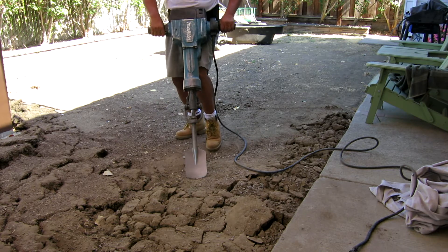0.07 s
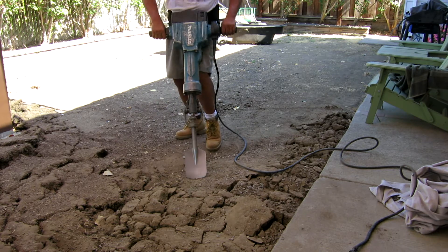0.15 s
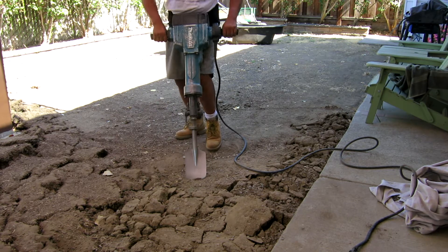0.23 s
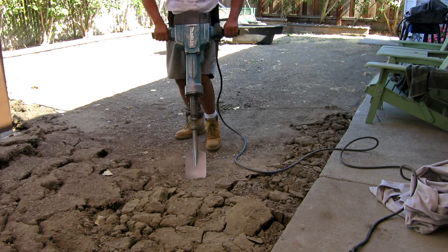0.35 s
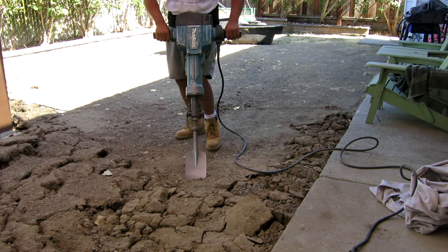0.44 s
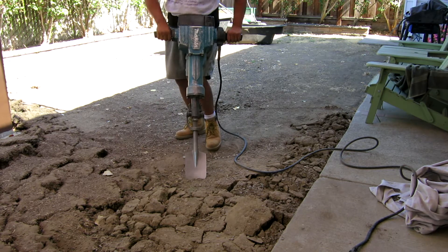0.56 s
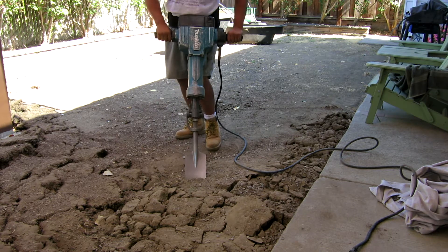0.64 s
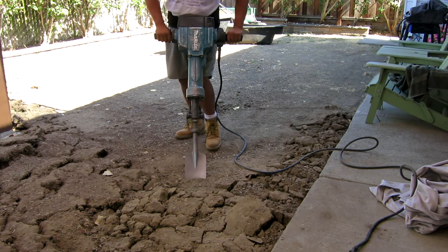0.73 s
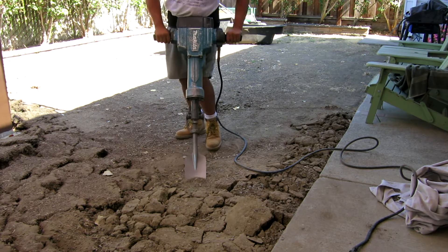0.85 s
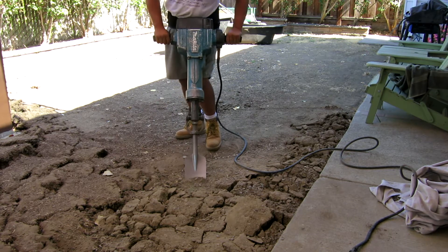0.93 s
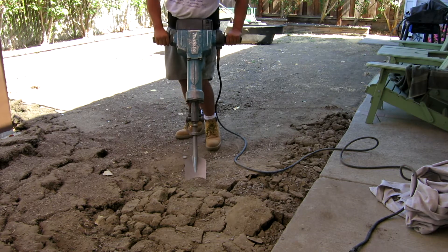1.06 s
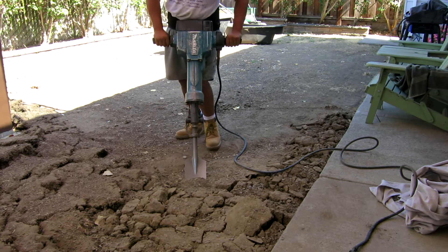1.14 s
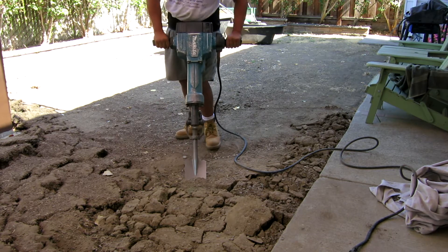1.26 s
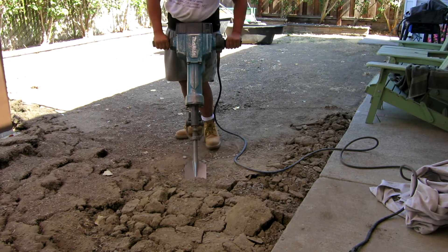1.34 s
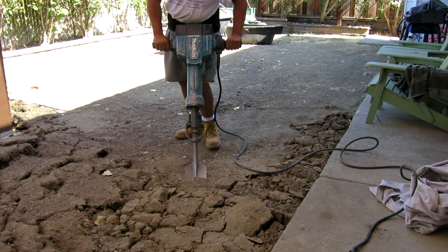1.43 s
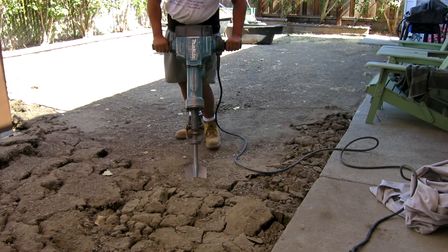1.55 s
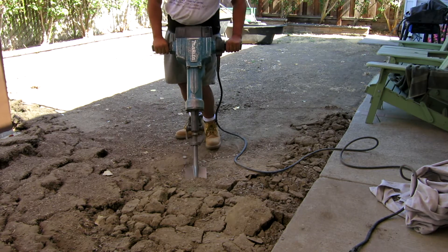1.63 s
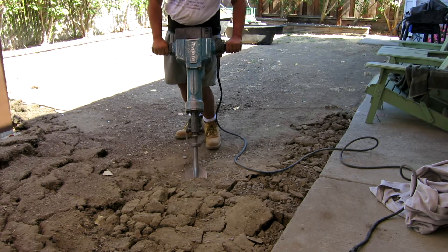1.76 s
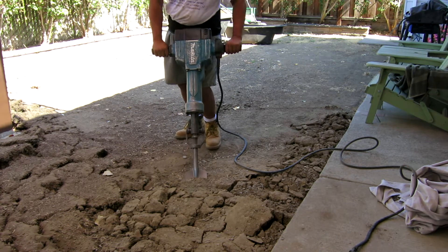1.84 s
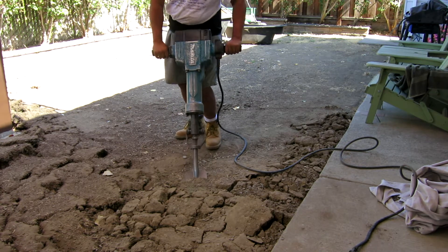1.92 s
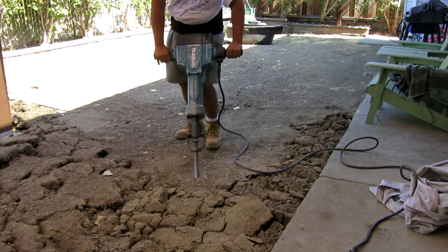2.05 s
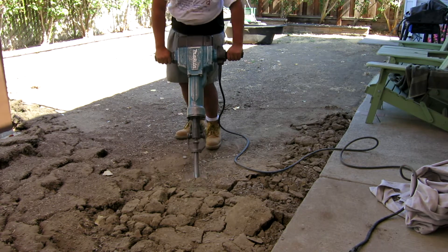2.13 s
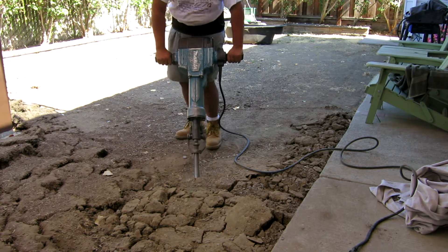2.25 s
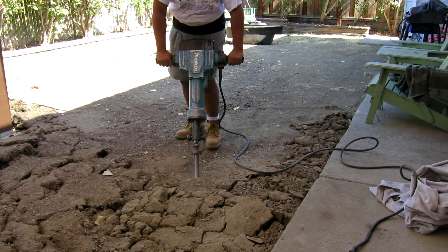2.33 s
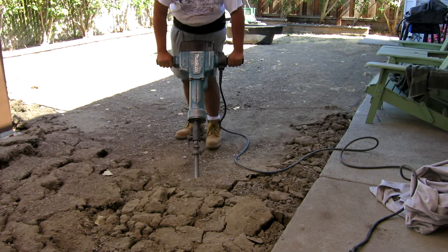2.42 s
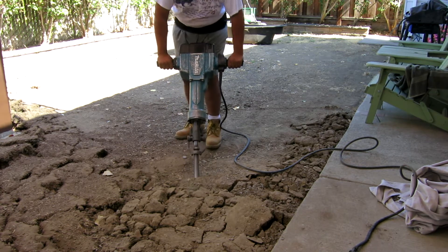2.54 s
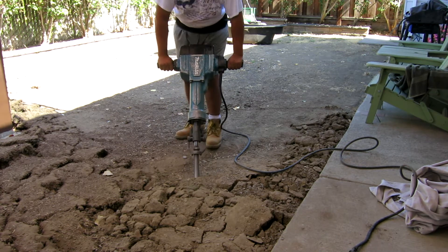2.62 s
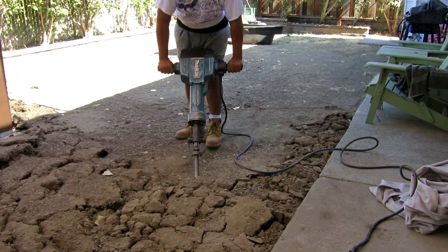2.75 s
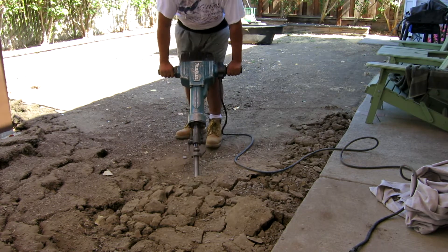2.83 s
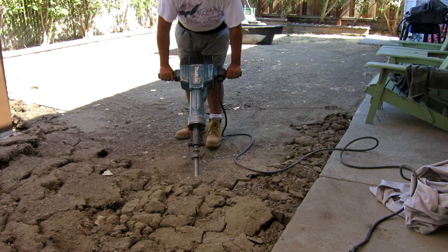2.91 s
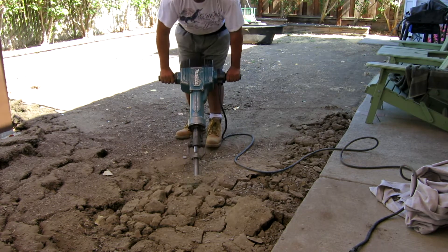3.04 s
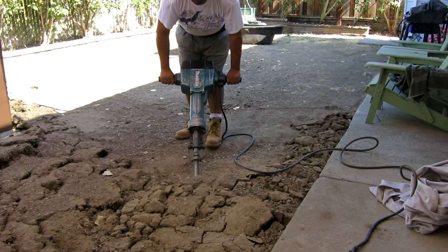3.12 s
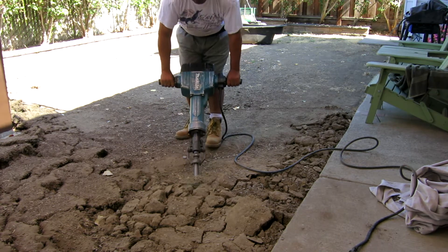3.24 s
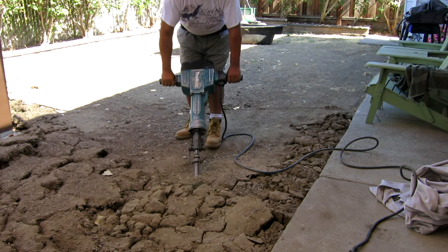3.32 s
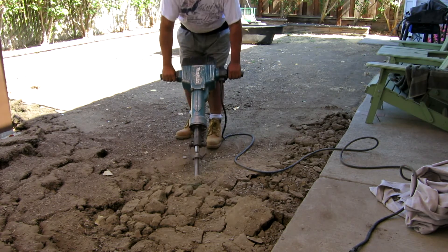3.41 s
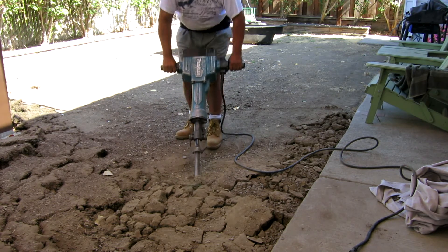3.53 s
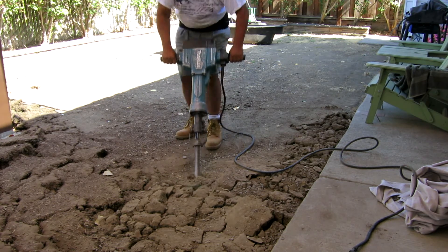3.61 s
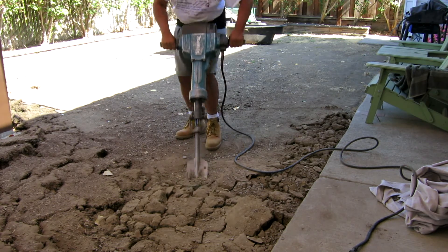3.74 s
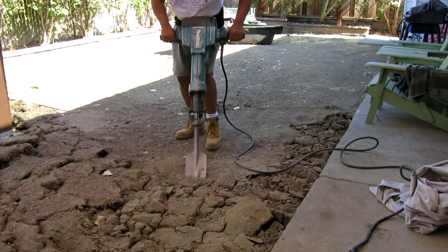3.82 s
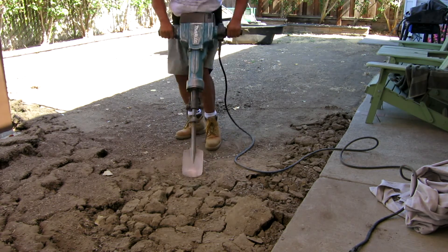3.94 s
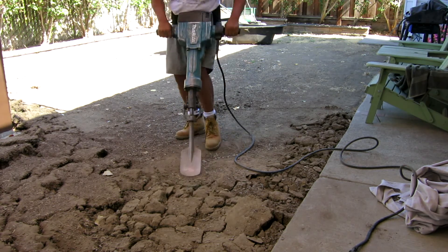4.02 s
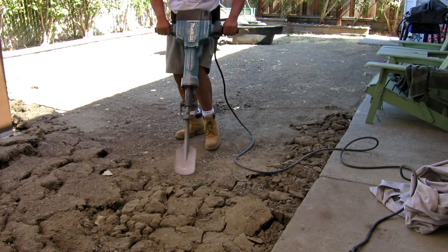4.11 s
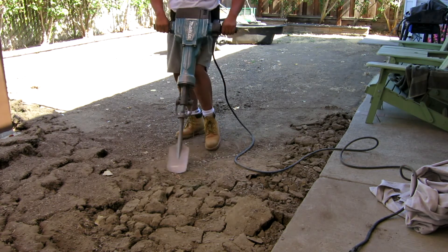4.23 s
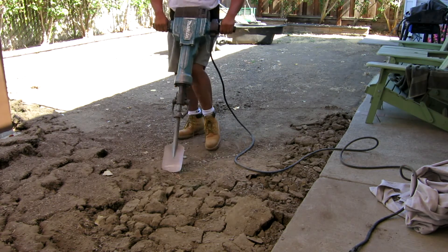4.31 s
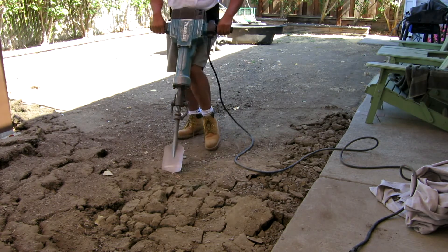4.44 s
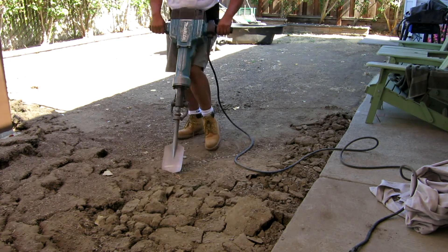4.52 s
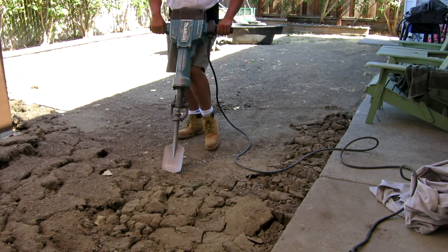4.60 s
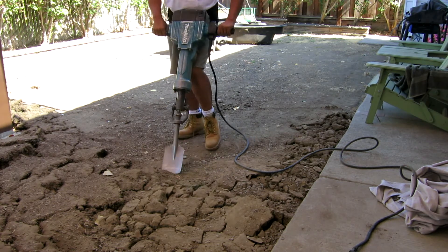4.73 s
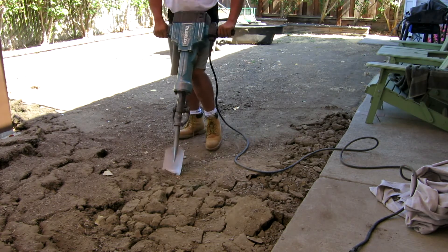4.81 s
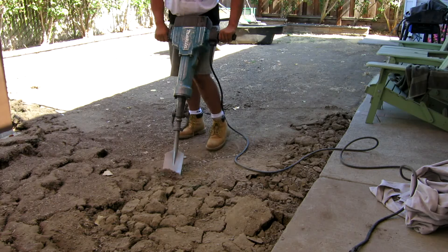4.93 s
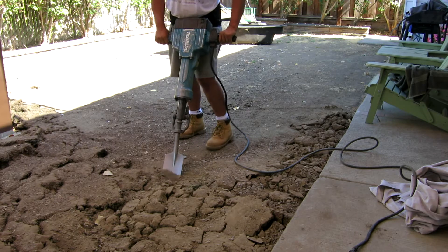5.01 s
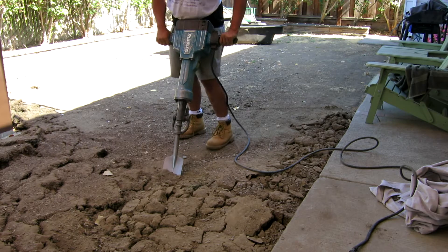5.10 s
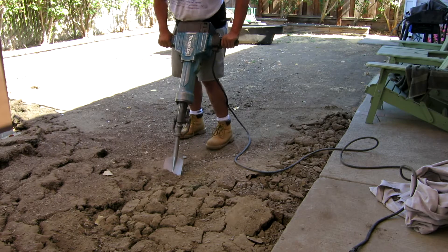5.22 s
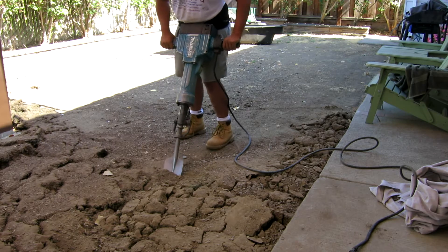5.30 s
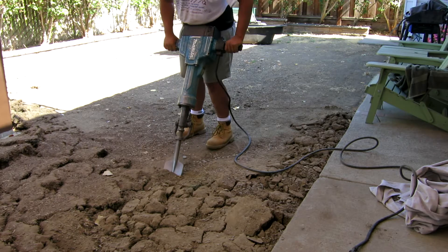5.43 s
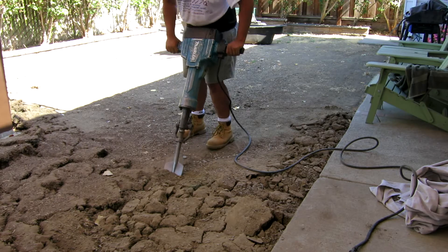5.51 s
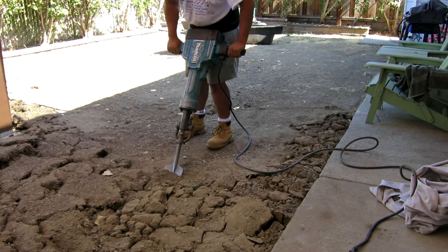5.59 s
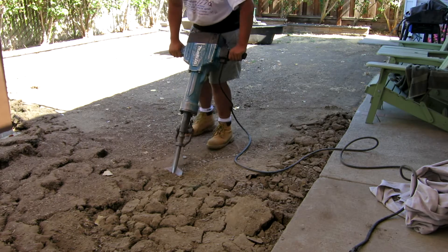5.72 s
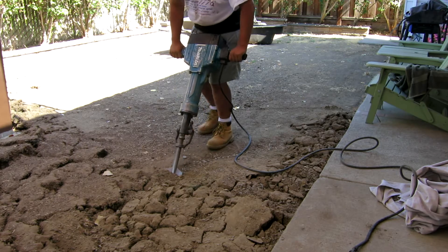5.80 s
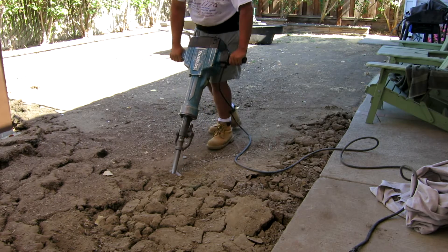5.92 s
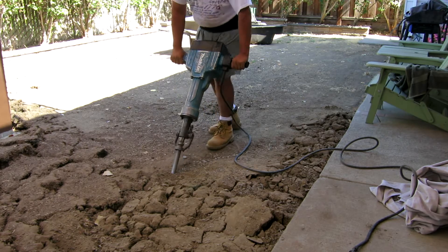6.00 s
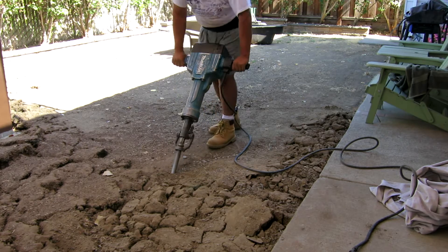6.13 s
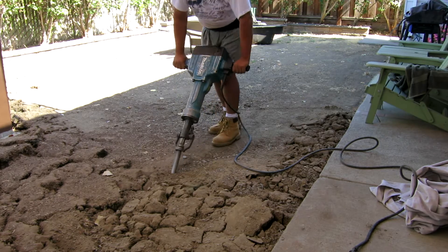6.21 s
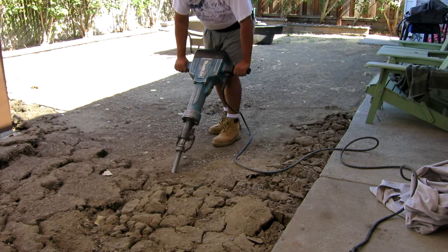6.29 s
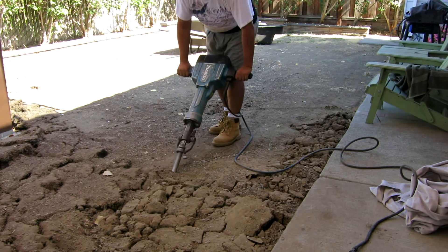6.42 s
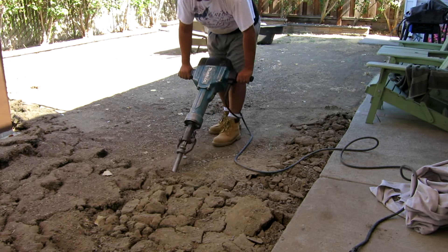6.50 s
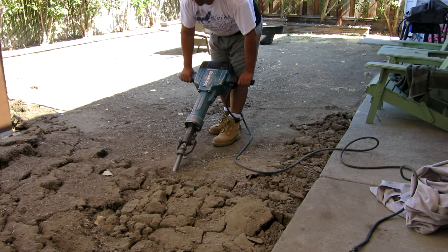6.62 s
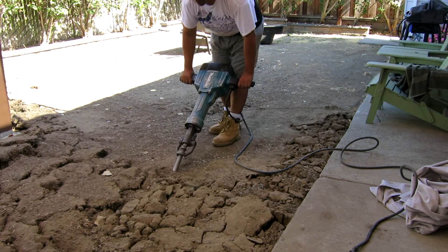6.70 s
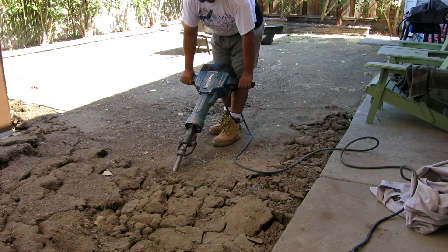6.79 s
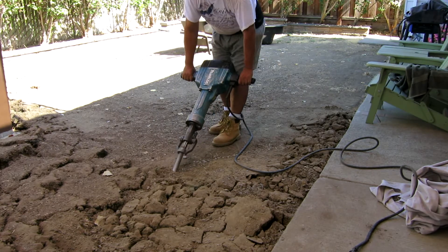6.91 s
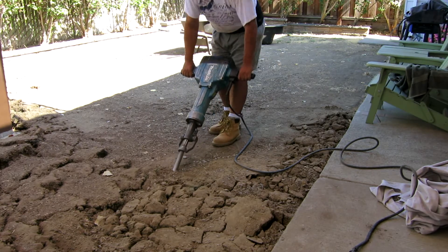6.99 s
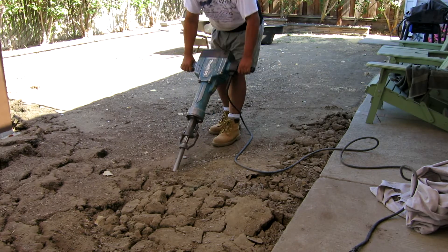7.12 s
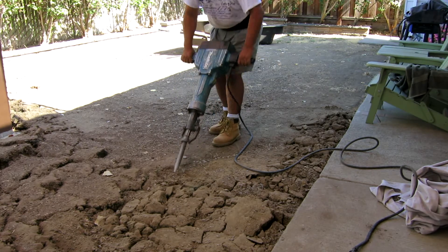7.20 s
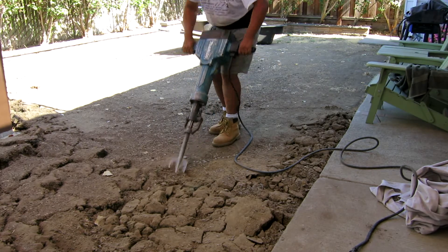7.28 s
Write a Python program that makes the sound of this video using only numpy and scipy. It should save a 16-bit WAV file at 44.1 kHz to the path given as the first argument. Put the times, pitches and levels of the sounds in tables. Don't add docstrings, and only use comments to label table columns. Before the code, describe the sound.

An electric demolition hammer works hard soil close to stereo microphones in a walled yard. At 0 s the motor whines downward, with idle ticks and loose bit taps at 0.1-0.3 s. Spaced, clattering blows begin at 0.4 s, jolting the ground, and quicken by 0.8 s into a steady burst of about fifteen a second until 2.66 s. Blade ringing is bright at first, then shorter and drier as the blade digs in. From 2.75 s a high gear whine shows, with knocks, three blows near 3.0-3.1 s and four at 3.3-3.5 s. The motor then winds down over ticking until 4.8 s, the bit dropping lightly near 4.47 s. A second burst runs 4.83-6.26 s as the motor picks up. Afterward come whine, a hard bit tap, sharper idle knocks, two blows around 6.85 s, and falling pitch to 7.35 s. Dull short echoes and mild overload colour the hits.

```python
import sys
import numpy as np
from scipy import signal
from scipy.io import wavfile
from scipy.ndimage import uniform_filter1d, minimum_filter1d

SR = 44100
rng = np.random.default_rng(int(sys.argv[2]) if len(sys.argv) > 2 else 0)


def digitize_waveform(pressure):
    field = np.atleast_2d(pressure).T
    bounded = np.clip(field, -1, 1)
    quanta = np.round(bounded * 32767).astype(np.int16)
    wavfile.write(sys.argv[1], SR, quanta)


def invert_db(level):
    return 10 ** (np.asarray(level, dtype=float) / 20)


N = 324135

# time in seconds, gear mesh rate in Hz, whine level in dB.
SPEED = [(0, 2085, -41), (.2, 1920, -42), (.4, 1720, -50), (.62, 1640, -50), (2.7, 3210, -52),
         (2.9, 3490, -41), (3.36, 3640, -40), (3.55, 3245, -43), (3.7, 3030, -48), (3.85, 2830, -40),
         (4.25, 2440, -47), (4.5, 2210, -43), (4.82, 1940, -38.5), (5.1, 3000, -43), (6.3, 3206, -43),
         (6.74, 3650, -38), (6.9, 3610, -41), (7.08, 3330, -42), (7.35, 2990, -43)]
# start in seconds, end in
# seconds.
RUNS_FREE = [
    (0, .4),
    (2.75, 4.82),
    (6.35, 7.35),
]
# frequency in Hz, density in dB per Hz.
MOTOR_COLOUR = [(18, -75), (30, -24), (118, -27), (415, -3.5), (526, -12), (600, -7), (1350, -0.5),
                (2750, 2.5), (4650, -6), (7670, -1.5), (11400, -15), (14800, -14), (16000, -73)]
# frequency in Hz, left-right likeness from 0 to 1.
MOTOR_LIKENESS = [(60, 0.68), (180, 0.97), (550, 0.99), (1650, 0.95), (4970, 0.79), (15000, 0.04)]
# frequency in Hz, width in Hz, level in dB.
HOUSING = [(427.5, 28, -3), (608.4, 16, 0), (1457, 92, 4), (1595, 15, 1)]
# frequency in Hz, width in Hz, level in dB.
BOOM_MODES = [(725, 45, -6), (988, 40, -2.5)]
# frequency in Hz, width in Hz, level in dB.
GEAR_RINGS = [(1580, 77, -24), (2880, 49, -20.5), (5120, 69, -29), (7100, 360, -15.5)]
# time in seconds, peak boom in dB, rise in dB per second, fall in dB per second.
LEANS = [
    (0.309, -30, 500, 294),
    (3.03, -33, 122, 13),
    (3.45, -36, 21, 56),
    (6.901, -32.5, 19, 29),
]
# time in seconds, peak in dB.
TICKS = [(0.0126, -29.5), (0.2175, -28), (0.3237, -25.5), (0.3915, -27), (2.754, -26.5), (2.815, -37),
         (2.873, -32), (3.7094, -37), (3.842, -29.5), (4.06, -40), (4.137, -31), (4.1935, -36),
         (4.2162, -26), (4.2964, -28.5), (4.345, -29.5), (4.382, -28.5), (4.431, -31), (4.5257, -30),
         (4.562, -28), (4.615, -31), (4.6536, -30), (4.7525, -29), (4.815, -30), (6.5016, -25),
         (6.5571, -23), (6.779, -24), (7.061, -25), (7.1184, -27), (7.1798, -25), (7.243, -25)]
# time in seconds, peak in dB.
FAINT_TICKS = [(.068, -30), (.115, -27), (2.929, -38), (2.957, -47), (3.559, -35), (3.62, -40), (3.66, -37),
               (3.77, -33), (3.91, -35), (3.986, -41), (4.104, -34), (4.705, -40), (6.439, -31),
               (6.62, -26), (6.67, -27), (6.729, -26), (6.99, -27), (7.3, -27)]
# frequency in Hz, width in Hz, level in dB.
KNOCK = [(1510, 70, 4), (2850, 220, 5.5), (3280, 240, 5), (5040, 400, -6), (7300, 350, -4)]
# time in seconds, crack in dB, blade ring in dB, shank ring in dB, thud in dB.
STRIKES = [(1.153, -9.5, -12, -19, -38), (1.2189, -6.5, -13.5, -17, -35.5),
           (1.2885, -4.5, -9.5, -15.5, -37.5), (1.3548, -8, -13.5, -18.5, -48),
           (1.421, -8, -15, -18.5, -45), (1.4857, -9.5, -11, -18, -42.5), (1.553, -9, -13, -20, -50),
           (1.6171, -7, -13, -22.5, -49), (1.6815, -8, -14, -17.5, -43.5),
           (1.7476, -5.5, -11.5, -22, -40), (1.8125, -6.5, -10, -19, -45), (1.877, -8, -11.5, -18.5, -55),
           (1.941, -8.5, -14, -18.5, -53), (2.006, -9, -8.5, -20.5, -58), (2.0709, -13, -8.5, -19.5, -53),
           (2.1344, -14.5, -11.5, -17.5, -65), (2.199, -10.5, -13.5, -15, -51),
           (2.265, -9, -14.5, -13.5, -46), (2.3293, -5.5, -14.5, -14, -58),
           (2.3953, -4, -14.5, -13.5, -43), (2.4614, -6, -17, -13, -46), (2.5289, -5, -16, -14, -60),
           (2.5962, -5.5, -23, -16.5, -50), (2.6601, -7, -22, -20.5, -66),
           (4.8352, -6, -11, -17, -44), (4.924, -10, -13.5, -20.5, -39), (5.0012, -6.5, -10, -18, -36.5),
              (5.0749, -8.5, -10, -22, -42), (5.1427, -7, -9.5, -22.5, -36.5), (5.2085, -14, -10, -20, -42),
              (5.2776, -8.5, -8.5, -24, -39.5), (5.3435, -8.5, -9, -22, -43.5),
              (5.4101, -12.5, -7, -22, -51), (5.477, -10, -9.5, -22.5, -41.5),
              (5.5409, -9.5, -10.5, -19.5, -48), (5.6075, -11.5, -7, -19.5, -47),
              (5.6723, -13, -12, -19, -50), (5.7363, -11, -8, -21, -49), (5.8012, -12.5, -10, -18.5, -45),
              (5.8658, -16, -11, -20.5, -49), (5.9292, -11, -12, -21.5, -47), (5.9951, -13, -11, -18, -48),
              (6.061, -6, -21, -14.5, -47), (6.1268, -5, -17, -21.5, -52), (6.195, -7.5, -18.5, -15, -46),
              (6.261, -5, -21.5, -21, -43.5),
           (0.414, -7, -16.5, -19.5, -36), (0.5388, -8, -17.5, -22.5, -37.5), (0.6764, -9, -13.5, -16.5, -40),
         (0.7825, -5, -15.5, -19.5, -33), (0.8672, -6.5, -11.5, -16, -30.5), (0.942, -7, -14.5, -18, -34),
         (1.0146, -7.5, -16.5, -20.5, -41.5), (1.086, -6, -18, -21.5, -44), (3.0074, -6.5, -19, -23, -68),
         (3.0693, -3.5, -12.5, -19, -56), (3.1268, -3.5, -15, -19, -52), (3.2845, -5.5, -17.5, -20, -64),
         (3.3419, -10, -13.5, -17, -50), (3.3992, -6.5, -15.5, -20.5, -52), (3.461, -4, -14, -26.5, -48),
         (6.8343, -5.5, -17, -22.5, -59), (6.8925, -4, -14, -23.5, -51)]
# time in seconds, crack in dB, blade ring in dB, shank ring in dB, share of the rattle time from 0 to 1.
TAPS = [
    (0.129, -22, -19, -33, .35),
    (0.1555, -8, -22, -36, .55),
    (0.2635, 0, -14.5, -31, .28),
    (0.439, 1, -19, -23, .75),
    (0.5636, -2, -23, -30, .8),
    (0.6988, 1.5, -19, -30, .75),
    (4.4663, -13, -26, -37, .6),
    (4.4765, -14, -27, -41, .6),
    (6.388, 0, -33, -31, .75),
]
# time in seconds, depth from 0 to 1.
DIG = [(.13, 0.41), (.41, 0), (1.15, 0.21), (1.35, 0.43), (2.05, 0.59), (2.4, 0.73), (2.6, 0.99),
       (3.15, 0.69), (3.28, 0.61), (3.42, 0.63), (4.46, 0.25), (4.83, 0.01), (5.1, 0.14), (5.25, 0.47),
       (5.95, 0.47), (6.27, 1), (6.9, 0.65)]
# time in seconds, high bending mode in dB, low pair of modes in dB.
PRY = [(0, -4, 2), (1.3, -9, 0.5), (2.05, -18, -6), (2.14, 0, -3), (2.25, -5, -3), (2.5, -2, 1),
       (2.62, -8, -2), (3.0, 3, 4), (3.13, 4.5, 6), (3.3, -3, 7), (3.46, -2, 11), (4.46, -3, -5),
       (4.8, -5, -2), (5.9, -2, -3), (6.27, -2.5, -1.5), (6.85, 2, 5)]
# time in seconds, low tilt in dB, mid-band rattle in dB.
MOUNT = [(0.414, -23, -20), (0.5386, -28.5, -30.5), (0.6769, -32, -27), (0.7826, -22, -18),
         (0.8669, -29, -18), (0.942, -36.0, -22), (1.0146, -48.0, -29), (1.086, -52.5, -30),
         (1.153, -48, -22.5), (1.2195, -52.5, -27), (1.2884, -57.5, -32), (1.3544, -53.5, -27.5),
         (1.421, -59.0, -28.0), (1.4857, -56, -28), (1.553, -57, -28.5), (1.6173, -59.0, -28.0),
         (1.6815, -62.0, -26), (1.7478, -47, -29), (1.8126, -57.5, -33), (1.877, -68.5, -35),
         (1.94, -60.5, -37), (2.006, -68.5, -35), (2.0709, -58.5, -34), (2.1337, -63.5, -36),
         (2.2, -67.0, -38), (2.265, -71.0, -38), (2.3297, -64.0, -36), (2.3951, -54.5, -38),
         (2.4616, -53, -34), (2.5292, -52.5, -36), (2.5969, -58.0, -38), (2.6605, -71.5, -49),
         (3.0693, -59, -36), (3.3417, -62, -42), (3.461, -52.5, -41), (4.8352, -28, -20), (4.924, -23, -26),
         (5.0012, -39.0, -21), (5.0749, -39, -25), (5.1427, -37, -26), (5.2085, -37.5, -30),
         (5.2776, -42, -33.5), (5.3435, -57.0, -33.0), (5.4101, -47.5, -29.0), (5.477, -53.0, -34.5),
         (5.5409, -50.5, -33.5), (5.6075, -45.5, -35.5), (5.6723, -49.0, -33.0), (5.7363, -45.0, -33),
         (5.8012, -47.5, -32), (5.8658, -47.0, -34), (5.9292, -53.0, -33), (5.9951, -49.0, -37.0),
         (6.061, -48.0, -34.0), (6.1268, -45.0, -33.5), (6.195, -48.0, -33.0), (6.261, -42.5, -35.5),
         (6.8922, -50.5, -41)]
# frequency in Hz, density in dB per Hz.
CLATTER = [(300, -22), (700, -6), (1500, -2.5), (3000, -1.5), (5000, -1), (8000, -0.5), (12000, -10),
           (15000, -15)]
# frequency in Hz, share of the rattle t60.
CLATTER_HOLD = [(300, 0.19), (1500, 0.62), (5000, 0.75), (14000, 0.45)]
# frequency in Hz, width in Hz.
BLADE = [(2760, 150), (4170, 110), (4260, 70), (4335, 75), (4440, 130), (4600, 70), (4680, 90), (5680, 110),
         (6820, 60), (7300, 130)]
# level when free in dB, change when buried in dB.
BLADE_DB = [(-11, -23), (-75, -23), (-5, -10.5), (-0.5, -8), (-11, -5), (3, -29.5), (-9.5, -20),
            (-2.5, -32), (-34.5, 40.5), (-24.5, 14.5)]
# frequency in Hz, width in Hz.
SHANK = [(7980, 80), (8230, 130), (9245, 80), (9325, 80), (9900, 160), (11610, 110), (12960, 70),
         (13290, 80), (15350, 60)]
# level when free in dB, change when buried in dB.
SHANK_DB = [(-4.5, -38), (-2, -22.5), (3, -7.5), (0, -12.5), (-36, -15), (-5.5, -21.5), (-2, -11),
            (-8, -12), (5.5, -44)]
# frequency in Hz, left-right likeness from 0 to 1.
BLOW_LIKENESS = [(300, 1), (1000, 0.99), (2500, 0.99), (4300, 0.94), (7000, 0.55), (9300, 0.47),
                 (12000, 0.034)]
# frequency in Hz, left minus right in dB.
TILT = [(60, -1), (240, -0.5), (950, -2.5), (3770, -1), (15000, 3)]
# delay in seconds, level in dB.
ECHOES = [
    (.011, -10.5),
    (.023, -28),
    (.037, -42),
    (.058, -16.5),
]


def rms_one(x):
    return x / np.sqrt(np.mean(x ** 2) + 1e-20)


def in_time(rows):
    s, *columns = np.transpose(rows)
    return [np.interp(np.arange(N) / SR, s, c) for c in columns]


def at_hz(points, hz):
    table_hz, values = np.transpose(points)
    return np.interp(np.log(hz), np.log(table_hz), values)


def drift(rate):
    r = np.exp(-80 * np.pi * rate / SR)
    slow = signal.lfilter([1], [1, -2 * r, r * r], rng.standard_normal(N // 40 + 2002))[2000:]
    return np.interp(np.arange(N) / 40, np.arange(len(slow)), rms_one(slow))


def band_filter(order, edges_hz, x):
    return signal.sosfilt(signal.butter(order, edges_hz, "band", fs=SR, output="sos"), x)


def resonate(x, hz, width_hz):
    r = np.exp(-np.pi * width_hz / SR)
    poles = [1, -2 * r * np.cos(2 * np.pi * hz / SR), r * r]
    return signal.lfilter([1, 0, -1], poles, x) * np.sqrt((1 - r * r) / 2)


def ring_casing(noise, modes, uneven_db, rate):
    return sum(resonate(noise, hz, width) * invert_db(db + uneven_db * drift(rate)) for hz, width, db in modes)


def spread(pair, likeness, hz):
    alike = np.clip(at_hz(likeness, hz), 0, 1)
    opposite = np.array([[1], [-1]])
    sides = np.sqrt(1 + alike) * pair[0] + np.sqrt(1 - alike) * pair[1] * opposite
    return sides * invert_db(at_hz(TILT, hz) / 2 * opposite) / np.sqrt(2)


def bands(white, low_hz, count):
    edges = low_hz * 2 ** (np.arange(count + 1) / 2)
    for k, (low, high) in enumerate(zip(edges, edges[1:])):
        yield np.sqrt(low * high), band_filter(2, [low, high], white[k % 2])


def blows():
    struck = [(*row, 0, 1) for row in STRIKES]
    tapped = [(*row[:4], -58, 1, row[4]) for row in TAPS]
    s, crack, ring, shank, thump, tap, hold = np.array(sorted(struck + tapped)).T
    depth = np.interp(s, *np.transpose(DIG))
    free_t60_s, buried_t60_s, idle_hold, tap_crack_db = 0.46, 0.22, 0.78, -9
    idle = sum((s > a) & (s < b) for a, b in RUNS_FREE)
    t60 = (free_t60_s + (buried_t60_s - free_t60_s) * depth) * hold * idle_hold ** idle
    return dict(
        s=s,
        crack_db=crack + 3 + (depth - .5) + tap_crack_db * tap,
        blade_db=ring + 2 + 3 * depth,
        shank_db=shank + 6 + 0.5 * depth,
        grit_db=-20 + 0.8 * (crack + 10) + tap_crack_db * tap,
        thud_db=-38 + 1.35 * (thump + 45),
        depth=depth, t60=np.maximum(t60, .04), tap=tap)


def since_blow():
    columns, t = blows(), np.arange(N) / SR
    last = np.searchsorted(columns["s"], t, side="right") - 1
    since = np.where(last < 0, 9, t - columns["s"][last])
    return since, {name: column[last] for name, column in columns.items()}


def motor_db(since):
    load_lag_s, loaded_s, full_speed_hz = 1, 0.049, 3600
    r, t = np.exp(-1 / (load_lag_s * SR)), np.arange(N) / SR
    octaves = np.log2(in_time(SPEED)[0] / full_speed_hz)
    load = signal.lfilter([1 - r], [1, -r], np.clip((loaded_s - since) / .01 + .5, 0, 1))
    knocks = np.array(TICKS)[:, 0]
    last_knock = knocks[np.searchsorted(knocks, t) - 1]
    swell_db = -1 * np.exp(-np.abs(t - last_knock) / 0.026)
    layers = {"growl": (-34.5, 3.9, -7), "gear": (-29.5, 9.2, 0.12), "hiss": (-34, 8, 7)}
    levels = [full + slope * octaves + loaded * load + swell_db for full, slope, loaded in layers.values()]
    leans = [db - np.maximum(rise * (s - t), fall * (t - s)) for s, db, rise, fall in LEANS]
    boom_db = np.max(leans + [-47 + 7.5 * octaves], axis=0)
    return levels + [boom_db]


def motor(since):
    growl_db, gear_db, hiss_db, boom_db = motor_db(since)
    white, together_db = rng.standard_normal((2, 2, N)), drift(19.0)
    layers = [0, 0, 0]
    for hz, pair in bands(white, low_hz=34.43, count=18):
        patchy = invert_db(at_hz(MOTOR_COLOUR, hz) + together_db + 1.56 * drift(15.3))
        layers[(hz > 1200) + (hz > 4200)] += spread(pair, MOTOR_LIKENESS, hz) * patchy
    hum = ring_casing(white[1, 1], HOUSING, uneven_db=1.04, rate=7.7)
    boom = ring_casing(white[1, 1], BOOM_MODES, uneven_db=1.04, rate=7.7)
    gear_case = ring_casing(white[0, 0], GEAR_RINGS, uneven_db=1.5, rate=12)
    growl = (rms_one(layers[0]) + invert_db(-9.0) * hum) * invert_db(growl_db - 3.0)
    struck_boom = boom * invert_db(boom_db) * (1 + np.exp(-since / 0.02))
    gear = (rms_one(layers[1]) + gear_case) * invert_db(gear_db)
    hiss = rms_one(layers[2]) * invert_db(hiss_db + 1.5)
    return growl + struck_boom + gear + hiss


def whine():
    t, (hz, level_db) = np.arange(N) / SR, in_time(SPEED)
    teeth_per_stroke, fade_s = 209, .05
    turns = np.cumsum(hz + 15 * drift(70)) / SR
    throb_db = 2.0 * np.sin(2 * np.pi * turns / teeth_per_stroke)
    broken_db = 3.0 * np.minimum(drift(25), .8)
    free = sum(np.clip(np.minimum(t - a + fade_s, b + fade_s - t) / fade_s, 0, 1) for a, b in RUNS_FREE)
    tone = np.sin(2 * np.pi * turns) + 0.08 * np.sin(4 * np.pi * turns)
    return np.sqrt(2) * tone * invert_db(level_db + throb_db + broken_db) * free


def ticks():
    force, click, t = np.zeros(N + 2000), np.zeros(N + 2000), np.arange(2000) / SR
    for s, db in [*TICKS, *FAINT_TICKS]:
        noise, start = rng.standard_normal(2000), round(s * SR)
        force[start:start + 2000] += invert_db(db - 10.5) * noise * np.exp(-t / 0.011)
        click[start:start + 2000] += invert_db(db - 7) * noise[::-1] * np.exp(-t / .0015)
    thin = band_filter(2, [2500, 9500], click[:N] + 1e-18)
    return thin + sum(resonate(force[:N] + 1e-18, hz, width) * invert_db(db) for hz, width, db in KNOCK)


def mount_db(blow):
    s, *levels = np.transpose(MOUNT)
    return [np.interp(blow["s"], s, db) - 24 * blow["tap"] for db in levels]


def shake(since, blow):
    peak_s = .005
    swell = since / peak_s * np.exp(1 - since / peak_s)
    burst = rng.standard_normal(N) * invert_db(mount_db(blow)[1] + 12.5) * swell
    return band_filter(2, (330, 1900), burst) * [[1], [-1]]


def thud(since, blow):
    struck = np.roll(np.diff(since, prepend=0) < 0, round(0.00396 * SR))
    way = np.where(drift(12) > 0, 1, -1)
    kicks = [struck * invert_db(blow["thud_db"] + 43.0), struck * way * invert_db(mount_db(blow)[0] + 47.5)]
    push, tilt = signal.lfilter([.05], [1, -.95], kicks)
    grit = rng.standard_normal(N) * invert_db(blow["thud_db"] + 13.0) * np.exp(-since / 0.012)
    jolt = push + grit + np.roll(tilt, round(0.0008 * SR)) * [[1], [-1]]
    return band_filter(1, [80, 320], jolt) + invert_db(-7.5) * band_filter(2, [300, 700], jolt)


def rattle(shape, uneven_db, per_s):
    strength_db = uneven_db * np.minimum(rng.exponential(1, shape), 4)
    knocks = (rng.random(shape) < per_s / SR) * invert_db(strength_db)
    return rms_one(rng.standard_normal(shape) * (1 + 1.65 * knocks))


def aftermath(since, t60, crack, crack_s, rebound):
    rebound_s = .023
    late = np.maximum(since - rebound_s, 0)
    bounce = rebound * (since > rebound_s) * np.exp(-late / 0.006)
    return invert_db(-60 * since / t60) * (1 + crack * np.exp(-since / crack_s) + bounce)


def clatter(since, blow):
    out = 0
    for hz, pair in bands(rattle((2, 2, N), uneven_db=1.5, per_s=1500), low_hz=269.0, count=12):
        soil = hz < 3500
        level_db = blow["grit_db"] + 6 if soil else blow["crack_db"] - 9
        t60 = blow["t60"] * at_hz(CLATTER_HOLD, hz)
        fade = aftermath(since, t60, crack=0.28, crack_s=0.001, rebound=0.085)
        fade = fade * (1 - soil * 0.37 * np.exp(-since / 0.0013))
        uneven = invert_db(at_hz(CLATTER, hz) + level_db + 2.6 * drift(46))
        out = out + spread(pair, BLOW_LIKENESS, hz) * uneven * fade
    return out


def ring_steel(drive, modes, levels, depth):
    out, (high_db, pair_db) = 0, in_time(PRY)
    for k, ((hz, width), (free_db, buried_db)) in enumerate(zip(modes, levels)):
        pry_db = (hz == 6820) * high_db + (hz in (4600, 4680)) * pair_db
        force = drive[k % 2] * invert_db(free_db + buried_db * depth + pry_db + 1.6 * drift(12)) + 1e-18
        out = out + spread(resonate(force, hz, width), BLOW_LIKENESS, hz)
    return out


def steel(since, blow):
    depth = blow["depth"]
    contacts = rattle((2, 2, N), uneven_db=3.5, per_s=600) * invert_db(0.83 * drift(87))
    kick = (np.diff(since, prepend=0) < 0) * rng.choice([-1, 1], (2, 2, N))
    contacts = contacts + kick * np.array([[16.0], [9.0]])
    rebound = np.clip(.6 - 2.0 * depth + 0.2 * drift(22), 0, 2)
    clang = 0.72 + 1.54 * depth

    def drive(level_db, hold, extra_clang):
        fade = aftermath(since, hold * blow["t60"], crack=clang + extra_clang, crack_s=0.01, rebound=rebound)
        return contacts * fade * invert_db(level_db)

    blade_drive = drive(blow["blade_db"] - 14.5, 1.05, extra_clang=.6 + 1.6 * blow["tap"])
    shank_drive = drive(blow["shank_db"] - 12, .85, extra_clang=.1 * depth)
    return ring_steel(blade_drive, BLADE, BLADE_DB, depth) + ring_steel(shank_drive, SHANK, SHANK_DB, depth)


def yard(x):
    dull, out = signal.sosfilt(signal.butter(1, 6000, fs=SR, output="sos"), x), x.copy()
    for k, (late, db) in enumerate(ECHOES):
        for side in (0, 1):
            lag = round(late * (1 + .13 * ((k + side) % 2)) * SR)
            out[side, lag:] += invert_db(db) * dull[1 - side, :-lag]
    return out


def pre_blow_gap(x):
    treble = signal.sosfiltfilt(signal.butter(3, 4800, "high", fs=SR, output="sos"), x)
    power = uniform_filter1d((treble ** 2).mean(axis=0), size=130) + 1e-12
    ahead = round(0.010 * SR)
    coming = -minimum_filter1d(-power, size=ahead, origin=-(ahead // 2))
    jump_db = 10 * np.log10(coming / np.roll(power, 60))
    return x - treble * uniform_filter1d(np.clip((jump_db - 17) / 4, 0, .93), size=40)


def top_gate(x):
    since, blow = since_blow()
    top = signal.sosfiltfilt(signal.butter(8, 13750, "high", fs=SR, output="sos"), x)
    open_s = .010 + .035 * np.clip(1 - blow["depth"] / .3, 0, 1)
    shut = np.clip((since - open_s) / .003, 0, 1) * (since < .075)
    return x - top * uniform_filter1d(np.roll(shut, -40), size=80)


def scene():
    since, blow = since_blow()
    hammer = ticks() + clatter(since, blow) + steel(since, blow)
    hammer = signal.sosfilt(signal.butter(3, 260, "high", fs=SR, output="sos"), hammer)
    return motor(since) + whine() + shake(since, blow) + thud(since, blow) + yard(hammer)


def top_cut(x):
    return signal.sosfilt(signal.butter(12, 16800, fs=SR, output="sos"), x)


def record(dry):
    rounded = .6 * np.tanh(dry / .6)
    dull = signal.sosfilt(signal.butter(4, 13500, fs=SR, output="sos"), rounded)
    return top_cut(top_gate(pre_blow_gap(dull)))


dry = scene()
out = record(dry)
digitize_waveform(out)
```